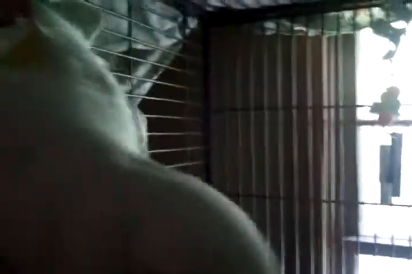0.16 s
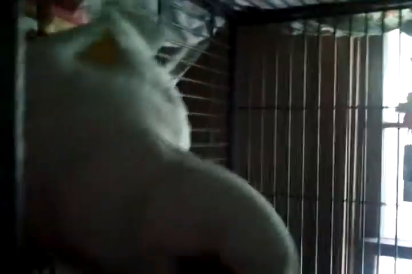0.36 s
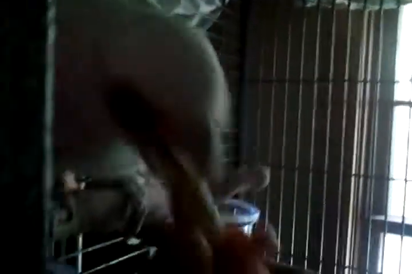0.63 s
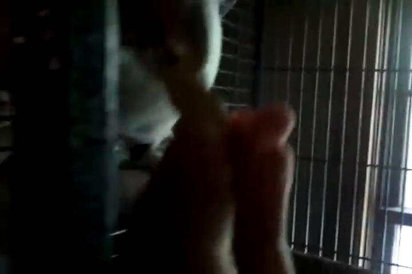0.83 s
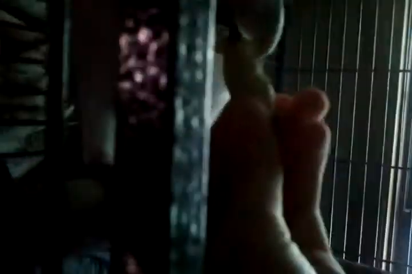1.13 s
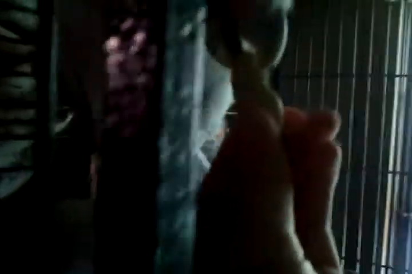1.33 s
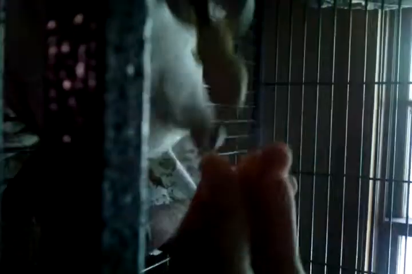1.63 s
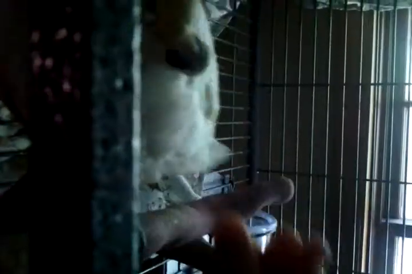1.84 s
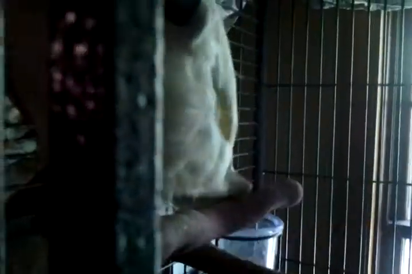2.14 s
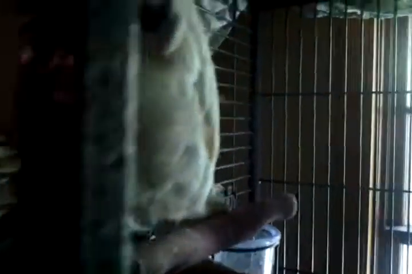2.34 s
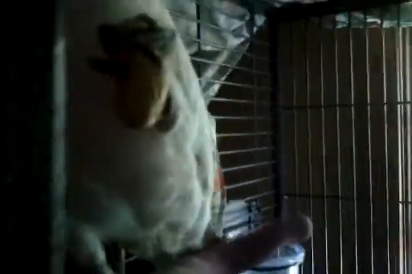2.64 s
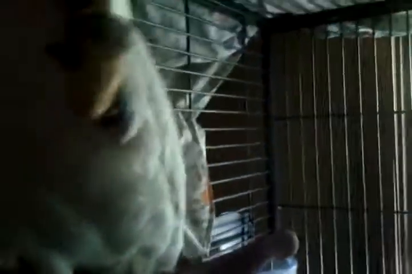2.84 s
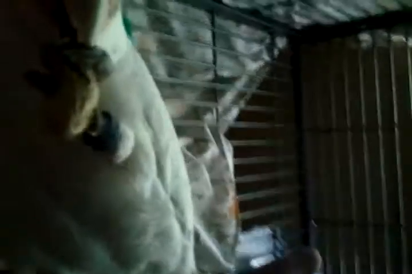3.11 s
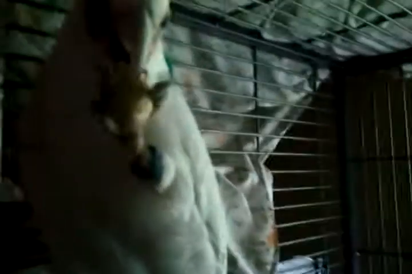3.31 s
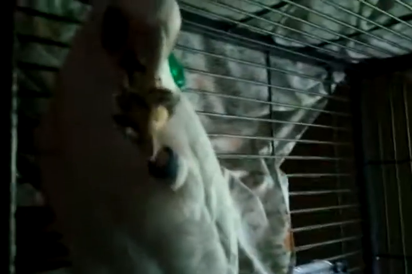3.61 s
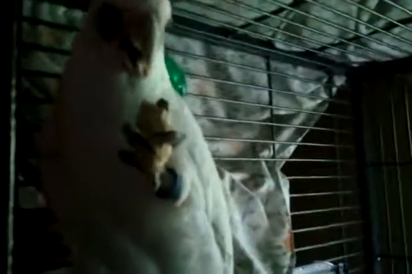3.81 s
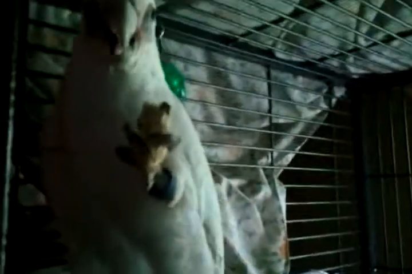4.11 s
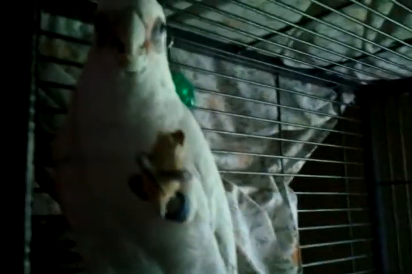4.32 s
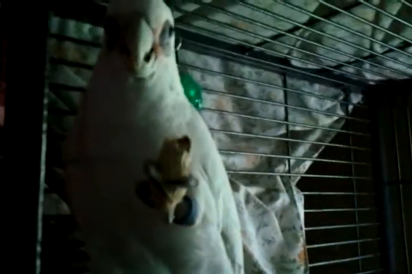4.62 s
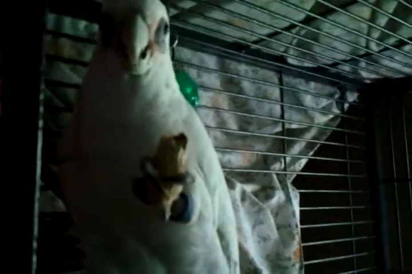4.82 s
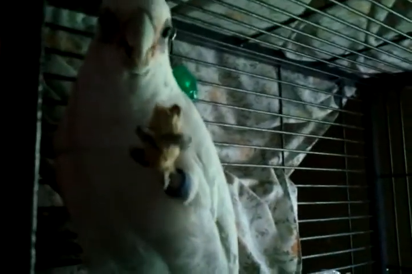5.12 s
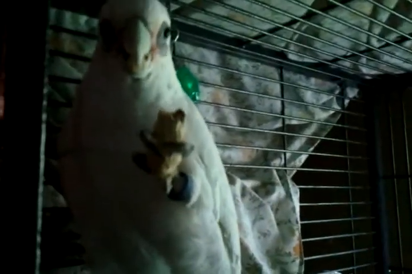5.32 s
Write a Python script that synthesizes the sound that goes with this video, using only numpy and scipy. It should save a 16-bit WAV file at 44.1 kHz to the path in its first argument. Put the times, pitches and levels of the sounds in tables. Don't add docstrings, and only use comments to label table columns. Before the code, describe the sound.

Close to a small handheld microphone in a quiet room, a parrot's claws and beak tick on cage wires. Clusters of hard clicks crash at about one second, a dense rattle follows past two, then cracking bites near three. Gnawing dies down and a thin, high squeak slips out late, over soft hiss and faint low hum.

```python
import sys
import numpy as np
from scipy import signal
from scipy.fft import rfft, irfft
from scipy.io import wavfile
from scipy.ndimage import uniform_filter1d, minimum_filter1d

SR = 44100
rng = np.random.default_rng(int(sys.argv[2]) if len(sys.argv) > 2 else 0)


def unload_audio(sound):
    columns = np.transpose(np.atleast_2d(sound))
    steps = np.round(np.clip(columns, -1, 1) * 32767)
    wavfile.write(sys.argv[1], SR, steps.astype(np.int16))


def magnitude_from_level(level_db):
    exponent = np.asarray(level_db, float) / 20
    return 10 ** exponent


N = 240609


def level(x, db):
    return x * magnitude_from_level(db) / np.sqrt(np.mean(x ** 2))


def colour(x, points):
    hz, db = np.transpose(points)
    grid = np.linspace(1, SR / 2, 1025)
    log_gain = np.interp(np.log(grid), np.log(hz), db) * np.log(10) / 20
    cepstrum = irfft(log_gain)
    cepstrum[1:1024] *= 2
    cepstrum[1025:] = 0
    response = irfft(np.exp(rfft(cepstrum)))
    return signal.fftconvolve(x, response)[:len(x)]


def band(x, hz, width_hz):
    return signal.lfilter(*signal.iirpeak(hz, hz / width_hz, fs=SR), x)


def walk(rate_hz):
    hold = int(SR / rate_hz)
    steps = np.repeat(rng.standard_normal(N // hold + 1), hold)
    return 1.3 * uniform_filter1d(uniform_filter1d(steps, hold), hold)[:N]


def grains(shape, spread_db):
    size = np.minimum(rng.exponential(size=shape), 5)
    return rng.standard_normal(shape) * magnitude_from_level(spread_db * size)


def decay(t, t60):
    return np.exp(-np.log(1000) * t / t60)


def ring(t, hz, t60, rise):
    return (1 - np.exp(-t / rise)) * decay(t, t60) * np.sin(2 * np.pi * hz * t)


def wire_ring(hz, t60, detune):
    t = np.arange(900) / SR
    first = ring(t, hz, t60, 0.11 * t60)
    second = 0.55 * ring(t, hz * (0.86 + 0.38 * detune), 0.6 * t60, 0.08 * t60)
    wire = first + second
    return wire / np.abs(wire).max() + 0.45 * ring(t, 7400, 0.0014, 0.0001)


def horn_knock(high, low):
    t, t60 = np.arange(900) / SR, 0.0036
    return ring(t, 2100 + 1200 * high, t60, 0.00038) + 0.24 * ring(t, 800 + 500 * low, t60, 0.00037)


# (time to peak [s], share [ratio])
THUMP_PULSES = [(0.00025, 0.84), (0.0009, 0.15)]


def low_thump(peak_db, vary):
    t = np.arange(900) / SR
    push_sum = sum(share * t / push * np.exp(1 - t / push) for push, share in THUMP_PULSES)
    return magnitude_from_level(-17 + 0.85 * peak_db + 1.33 * vary) * push_sum


def bar_buzz(shake, hz, body_db):
    bright = band(band(shake, hz, 2000), 5220, 1600)
    dull = band(shake, 1900, 2200)
    return bright + magnitude_from_level(body_db - 6.5) * dull


# (time [s], peak level [dB], ring pitch [Hz], cage share [dB])
CLIMBING = [(0.0136, -32.5, 4720, -1.5), (0.0288, -29.5, 5830, -20), (0.0765, -32, 5670, -2),
            (0.1228, -33.5, 5430, -5), (0.1693, -18.5, 6080, -5.5), (0.1741, -35, 5740, -19),
            (0.2653, -9.5, 5390, -10.5), (0.2739, -23.5, 5100, -8), (0.3058, -20.5, 5400, -9),
            (0.3498, -18.5, 5270, -13), (0.409, -33, 6160, -10.5), (0.412, -24, 5560, -3),
            (0.4826, -35, 4730, -16), (0.5687, -37, 7040, -7), (0.5743, -16, 4660, -12.5),
            (0.6095, -14, 5430, -7), (0.6551, -23, 5260, -5), (0.6616, -18.5, 5440, -8),
            (0.7146, -25, 5600, -6.5)]
# (time [s], peak level [dB], ring pitch [Hz], cage share [dB])
GRIPPING = [(0.7702, -14.5, 5860, -14), (0.7797, -16, 5100, -18), (0.803, -6.5, 5560, -17.5),
            (0.807, -25, 4940, -18), (0.8258, -15, 6000, -13), (0.8334, -8, 5500, -7.5),
            (0.8354, -5, 6480, -11), (0.8372, 0, 6660, -21), (0.8389, -3.5, 4920, -27),
            (0.8442, -17, 6300, -23), (0.851, -21, 5600, -21), (0.868, -21.5, 5070, -14),
            (0.9162, -8.5, 5380, -17), (0.928, -32, 5570, -4), (0.9356, -21, 5630, -19),
            (0.957, -31, 5850, 0), (1.0326, -30, 5750, -21), (1.068, -35, 6500, 2.5),
            (1.0749, -30.5, 5430, -14)]
# (time [s], peak level [dB], ring pitch [Hz], cage share [dB])
TUGGING = [(1.1205, -16, 5840, -7), (1.1274, -1, 5580, -8), (1.1341, 0.5, 5830, -9),
           (1.1401, -10.5, 5470, -3), (1.1431, -6.5, 6000, -13.5), (1.1615, -19, 6400, -16),
           (1.1636, 3, 5620, -6), (1.1684, -8, 4670, -17), (1.1872, 4, 5660, -5.5), (1.1917, -2, 5830, -24),
           (1.1974, -22, 6060, -17), (1.2075, -14, 5500, -9), (1.236, -17, 5400, -4.5)]
# (time [s], peak level [dB], ring pitch [Hz], cage share [dB])
STEPPING = [(1.318, -29.5, 6260, 0), (1.3247, -26.5, 5120, -11), (1.3622, -18.5, 5940, -11.5),
            (1.4048, -29, 5860, -2.5), (1.4445, -21.5, 5800, -20), (1.4455, -19.5, 5550, -18),
            (1.481, -32.5, 5450, 3.5), (1.4944, -32, 5800, 1), (1.5108, -28.5, 5530, 2),
            (1.5264, -25, 5550, -4.5), (1.6924, -37, 5800, -24), (1.7289, -24, 5650, -17),
            (1.7431, -31, 5650, -26), (1.7466, -25.5, 5900, -23), (1.8219, -4, 5760, -17),
            (1.8279, -23, 5400, -22), (1.9228, -34.5, 6000, 4), (1.9458, -23, 5440, -26),
            (1.9498, -14, 6060, -17), (1.9569, -29, 6240, -8), (2.0298, -33, 5600, -22),
            (2.0578, -26.5, 5650, -2.5), (2.0977, -30, 5740, -5), (2.114, -21.5, 5570, -17)]
# (time [s], peak level [dB], ring pitch [Hz], cage share [dB])
SETTLING = [(2.158, -38, 5570, 5), (2.1758, -32, 5830, -13), (2.1787, -27.5, 5650, -3),
            (2.189, -24.5, 6650, -16), (2.2025, -9, 6180, -13.5), (2.2167, -10, 5560, -36.5),
            (2.2212, -15.5, 6330, -19), (2.2258, -17, 6640, -3.5), (2.2404, -18, 6100, -18),
            (2.2451, -2, 6360, -3), (2.2745, -13.5, 6630, -17), (2.2813, -20, 5670, -7),
            (2.2926, 0, 6600, -17), (2.2967, -16.5, 4870, -10), (2.3192, -9.5, 6230, -12.5),
            (2.331, 2.5, 5410, -19), (2.3388, -7, 5540, -5.5), (2.3463, -22.5, 5700, -21),
            (2.3732, -19, 5950, -3), (2.3814, -0.5, 5480, -7), (2.3905, -7, 7370, -43.5),
            (2.3944, -7.5, 5250, -7), (2.398, -17, 4940, -11.5), (2.402, -8, 6830, -19),
            (2.41, -11.5, 5630, -11), (2.535, -34.5, 4830, -3), (2.6262, -39.5, 5400, -0.5),
            (2.6547, -36.5, 5730, -3)]
# (time [s], peak level [dB], ring pitch [Hz], cage share [dB])
BITING = [(2.8782, -27, 5600, -7.5), (2.915, -34, 5740, -13), (2.9265, -27, 5940, -7),
          (2.9538, 0.5, 5830, -27), (2.9566, -7.5, 4930, -8.5), (2.962, -16.5, 5670, -8),
          (2.9693, -16, 6200, -15), (2.9853, -12, 6000, -20), (2.9982, -19, 5130, -22),
          (3.077, -29, 5730, -14), (3.0803, -28.5, 5840, -2), (3.099, -18, 4130, -5),
          (3.106, -3.5, 5440, -10), (3.1093, -13, 5900, -9)]
# (time [s], peak level [dB], ring pitch [Hz], cage share [dB])
GNAWING = [(3.354, -43, 2550, -8), (3.379, -41.5, 5800, -1), (3.4163, -29.5, 5600, -23),
           (3.4265, -33, 5560, -19), (3.4508, -34, 6200, -3.5), (3.468, -24.5, 5970, -13),
           (3.482, -15.5, 5800, -8.5), (3.4861, -14.5, 5900, -8.5), (3.4907, -16.5, 5080, -9),
           (3.5038, -16, 5700, -29), (3.511, -22.5, 7300, -22), (3.516, -25, 5500, -21),
           (3.5188, -22.5, 5300, -17), (3.6154, -18.5, 5700, -32), (3.6167, -17.5, 5570, -10),
           (3.6688, -34.5, 5600, -2.5), (3.7126, -31.5, 5650, -5.5), (3.7663, -31.5, 5700, -3.5),
           (3.7752, -27.5, 5420, -7.5), (3.9935, -41.5, 5800, 1), (4.187, -42, 5900, -3),
           (4.651, -21.5, 5050, -8), (4.6519, -30.5, 2870, -23), (4.6542, -25, 5700, -17),
           (4.895, -56.5, 5160, 13.5), (5.297, -54.5, 3370, 17)]
# (ring t60 [ms], knock re ring [dB], knock change per blow level [dB/dB])
CONTACTS = [
    (5.14, -22, -.4),
    (4, -21.5, 0.07),
    (5, -17, 0.4457),
    (4.1, -16.5, 0),
    (3.93, -10.5, 0.07),
    (3.04, -14.5, 0.26),
    (4.04, -9, 0.5),
]


def ticks():
    usual_blow_db, bounce_s, bounce_db = -20, 0.0059, -16.5
    direct, buzz, feed = np.zeros((3, N + SR))
    t = np.arange(SR // 8) / SR
    buzz_fade = decay(t, 0.03) * (1 - np.exp(-t / 0.00015))
    rattle = grains(N + SR, spread_db=5.5)
    actions = [CLIMBING, GRIPPING, TUGGING, STEPPING, SETTLING, BITING, GNAWING]
    for action, (ring_ms, knock_db, slope) in zip(actions, CONTACTS):
        for s, peak_db, hz, cage_db in action:
            chance = rng.random(4)
            body_db = knock_db + slope * (peak_db - usual_blow_db)
            wire = wire_ring(hz, ring_ms / 1000, chance[0])
            knock = magnitude_from_level(body_db + 5.5) * horn_knock(chance[1], chance[3])
            thud = low_thump(peak_db, chance[2])
            hit = int((s - 0.0003) * SR)
            bounce = hit + int(bounce_s * (0.32 + chance[3]) * SR)
            direct[hit:hit + len(wire)] += magnitude_from_level(peak_db + 2.5) * (wire + knock + thud)
            direct[bounce:bounce + len(wire)] += magnitude_from_level(peak_db + bounce_db) * wire
            shake = buzz_fade * rattle[hit:hit + len(t)]
            buzz[hit:hit + len(t)] += magnitude_from_level(peak_db + cage_db - 2) * bar_buzz(shake, hz, body_db)
            feed[hit] = magnitude_from_level(peak_db + cage_db) ** 2
    return direct[:N], buzz[:N], feed[:N]


# (time [s], rubbing level [dB], weight shifting on perch and tray [dB])
RUBBING = [(0.0, -49.5, -59), (0.26, -49.5, -60.5), (0.41, -54.5, -55), (0.77, -51, -53),
           (0.91, -76, -63.5), (1.17, -38.5, -50.5), (1.37, -52, -56), (1.81, -52.5, -65.5),
           (1.96, -48.5, -58), (2.17, -50.5, -57), (2.26, -35, -42), (2.31, -29, -39), (2.45, -59.5, -52.5),
           (2.95, -49.5, -68.5), (3.4, -53.5, -57.5), (4.151, -58.5, -62.5), (5.07, -56, -61.5),
           (5.46, -60, -59)]
# (frequency [Hz], gain [dB])
CAGE_COLOUR = [(100, -29), (1000, -12), (2500, -12), (3800, -3.5), (5400, 12), (7000, -1.5), (9000, -17),
               (22000, -34.5)]


def scrape():
    ruffle_s, ruffle_db, plumage_db = 5.27, 6.5, -8.5
    s, wire_db, creak_db = np.transpose(RUBBING)
    t = np.arange(N) / SR
    slips = grains((3, N), spread_db=2.5) * magnitude_from_level(1.5 * walk(60))
    slips = slips * magnitude_from_level(ruffle_db * np.exp(-((t - ruffle_s) / 0.09) ** 2))
    wire = level(colour(slips[0], CAGE_COLOUR), 0)
    plumage = level(band(slips[1], 1700, 2400), 0)
    creak = band(slips[2], 180, 210) + band(slips[2], 310, 170) + 0.27 * band(slips[2], 533, 200)
    low = magnitude_from_level(plumage_db) * plumage + level(creak, 0)
    return magnitude_from_level(np.interp(t, s, wire_db)) * wire + magnitude_from_level(np.interp(t, s, creak_db)) * low


# (time [s], pitch [Hz], level [dB])
LONG_SQUEAK = [
    (4.438, 4250, -38),
    (4.45, 4316, -27),
    (4.465, 4250, -38),
    (4.495, 4170, -28.5),
    (4.515, 3990, -40),
    (4.528, 3880, -42.5),
    (4.535, 3600, -61),
]
# (start [s], length [s], pitch [Hz], peak level [dB])
PEEPS = [
    (4.131, .065, 3725, -58),
    (6.3, .08, 6090, -60),
    (4.958, .04, 4450, -44.5),
    (4.957, .06, 6080, -54),
    (5.117, 0.09, 6210, -54),
]
# (delay [s], level [dB])
ECHOES = [(0.022, -22), (0.036, -18)]


def squeaks():
    attack_s, edge_db, sag_hz = 0.017, -21, 72
    t, out = np.arange(N) / SR, np.zeros(N)
    calls = [LONG_SQUEAK]
    for s, length, hz, db in PEEPS:
        start = (s, hz - sag_hz / 2, db + edge_db)
        end = (s + length, hz - sag_hz, db + edge_db)
        calls.append([start, (s + attack_s, hz, db), end])
    for call in calls:
        s, hz, db = np.transpose(call)
        phase = 2 * np.pi * np.cumsum(np.interp(t, s, hz)) / SR
        swell = uniform_filter1d(np.interp(t, s, magnitude_from_level(db), left=0, right=0), size=200)
        out += np.sqrt(2) * swell * np.sin(phase)
    lag = np.arange(SR // 2) / SR
    tail = magnitude_from_level(-33.5) * rng.standard_normal(len(lag)) * decay(lag, 0.25) * (lag > 0.01)
    echoes = sum(magnitude_from_level(db) * np.roll(out, int(delay * SR)) for delay, db in ECHOES)
    return out + signal.fftconvolve(out, tail)[:N] + echoes


def room(feed):
    t60_s, fill_s, room_db = 0.22, 0.0012, -12.5
    keep = np.exp(-2 * np.log(1000) / (t60_s * SR))
    fill = np.exp(-1 / (fill_s * SR))
    energy = signal.lfilter([1 - fill], np.convolve([1, -keep], [1, -fill]), feed)
    noise = level(colour(rng.standard_normal(N), CAGE_COLOUR), 0)
    return magnitude_from_level(room_db) * np.sqrt(np.abs(energy)) * noise


# (frequency [Hz], density [dB per Hz])
HUSH_COLOUR = [(15, -37), (30, -21.5), (50, -15), (150, -6), (500, -10.5), (3000, -14), (5200, -6),
               (7300, -27), (8300, -28), (9300, -62.5), (22000, -120)]
# (multiple [ratio], level [dB])
HUM_PARTIALS = [(1, -71), (2, -76), (3, -68.5)]


def hush():
    hum_hz, air_db = 58.4, -56.5
    air = colour(rng.standard_normal(N), HUSH_COLOUR) * magnitude_from_level(1.0 * walk(7.7))
    phase = 2 * np.pi * np.cumsum(hum_hz * (1 + 0.0063 * walk(3.0))) / SR
    hum = sum(magnitude_from_level(db + 2.0 + 0.58 * walk(11.0)) * np.sin(k * phase) for k, db in HUM_PARTIALS)
    return level(air, air_db) + hum


# (frequency [Hz], gain [dB])
PORT_COLOUR = [(100, -15), (1500, -1), (3500, 0.5), (4700, 0), (5500, -1.5), (7000, 2.5), (8000, 0.5),
               (8800, -13.5), (9600, -94), (22000, -110)]


def scene():
    direct, buzz, feed = ticks()
    cage = direct + buzz + room(feed) + scrape() + squeaks()
    return (colour(cage, PORT_COLOUR) + hush())[None]


def low_pass(x):
    return signal.sosfilt(signal.butter(12, 16950, fs=SR, output="sos"), x)


def record(dry):
    limit, top, bottom, lopsided, knee = 0.92, 0.73, 0.7, 0.2, 0.63
    loudest = -minimum_filter1d(-np.abs(dry), size=24)
    gain = uniform_filter1d(np.minimum(1, limit / (loudest + 1e-9)), size=24)
    flat = np.clip(dry * gain, -bottom, top)
    flat = flat + lopsided * np.maximum(np.abs(flat) - knee, 0)
    mix = signal.sosfilt(signal.butter(14, 15300, fs=SR, output="sos"), flat)
    return low_pass(mix)


dry = scene()
out = record(dry)
unload_audio(out)
```